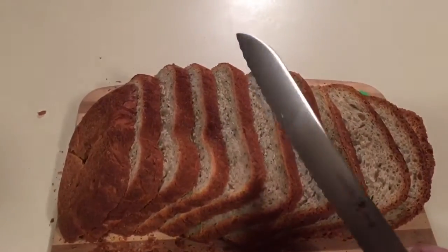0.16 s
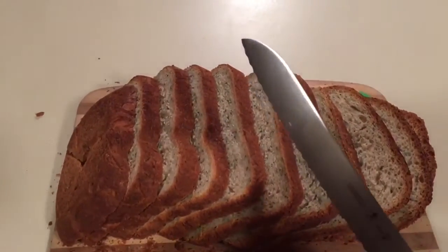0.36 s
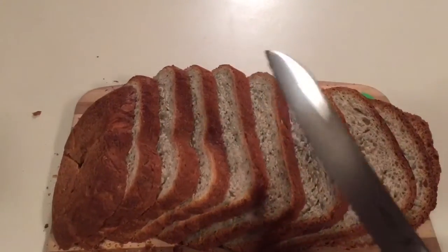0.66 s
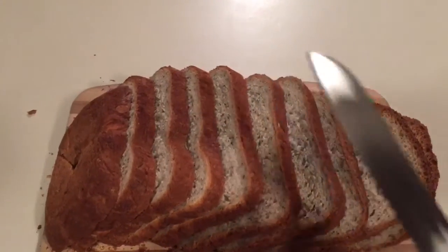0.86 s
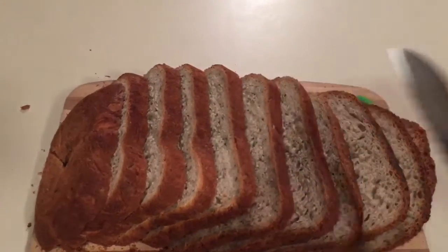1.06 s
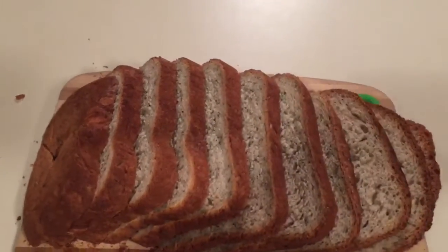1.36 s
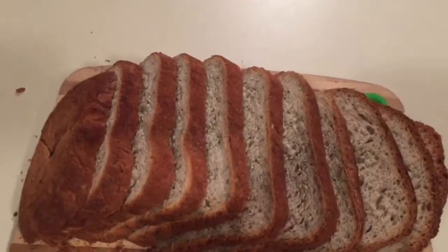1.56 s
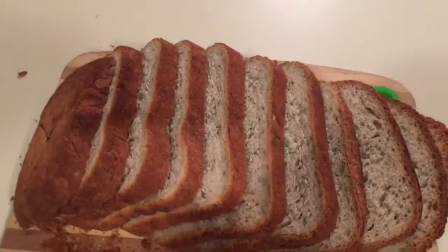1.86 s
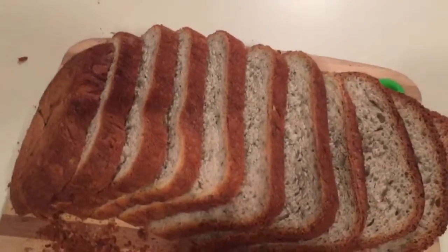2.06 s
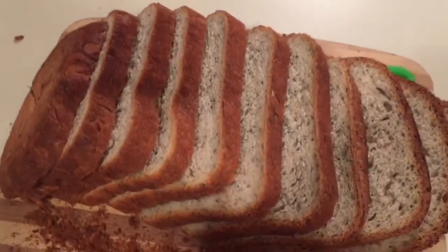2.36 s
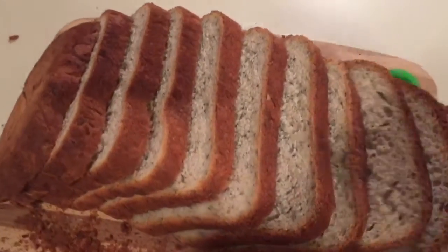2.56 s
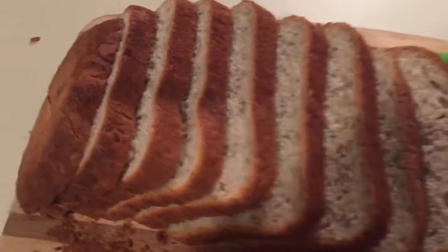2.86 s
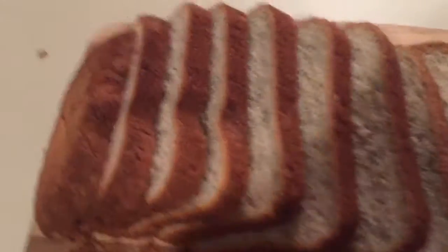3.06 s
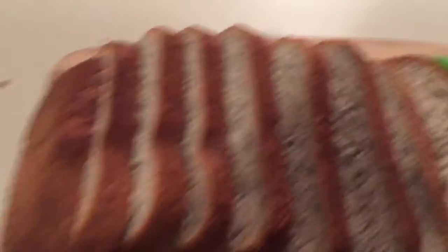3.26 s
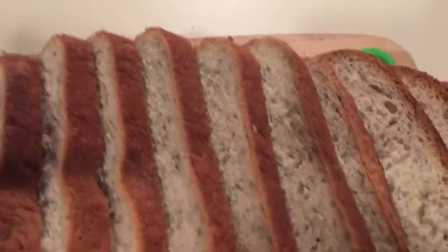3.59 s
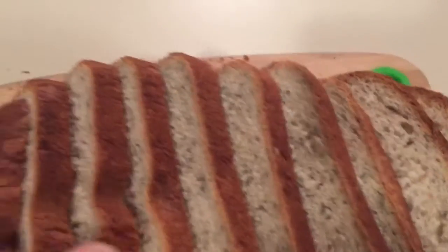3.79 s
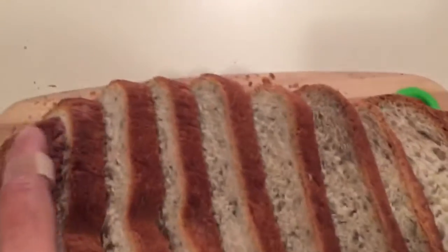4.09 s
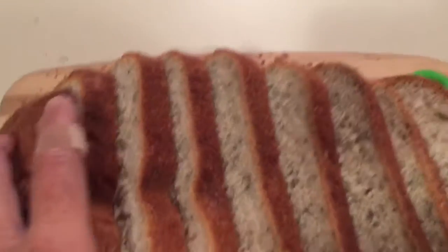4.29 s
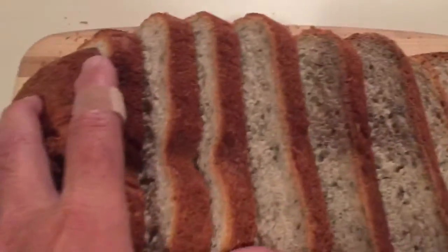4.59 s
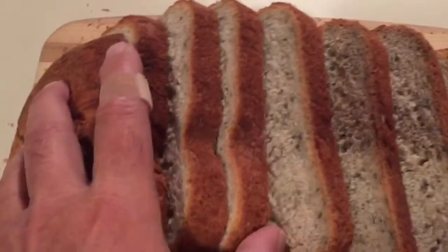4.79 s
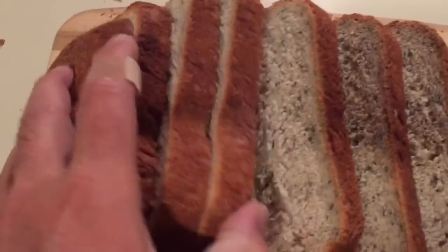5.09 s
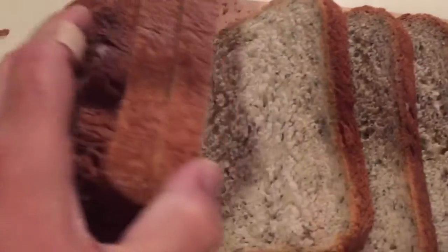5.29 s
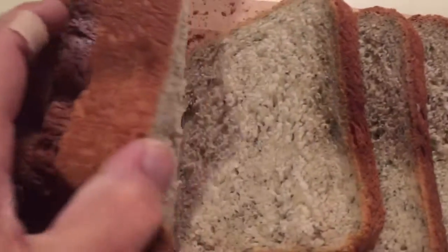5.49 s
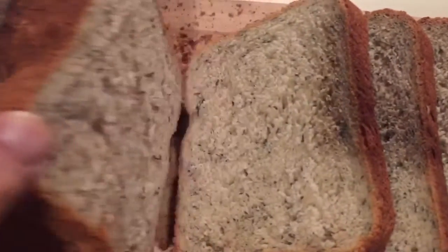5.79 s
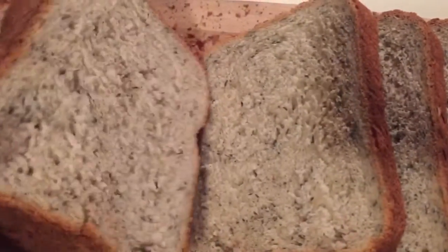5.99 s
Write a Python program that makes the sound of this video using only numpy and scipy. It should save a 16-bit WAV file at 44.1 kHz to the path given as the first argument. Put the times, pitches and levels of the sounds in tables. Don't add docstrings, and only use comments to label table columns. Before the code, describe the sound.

In a quiet, short, bright kitchen, low house hum and soft hiss continue beneath faint handling bumps. A long steel knife is put down off to the side, its blade ringing and handle knocking in a fast rattle. After a lull and a tiny scuff on the phone, fingers crackle the crust lightly, then slices are tipped apart with denser snaps, dry rubbing and soft board thumps close to the microphone.

```python
import sys
import numpy as np
from scipy import signal
from scipy.fft import rfft, irfft
from scipy.io import wavfile
from scipy.ndimage import uniform_filter1d

SR = 44100
rng = np.random.default_rng(int(sys.argv[2]) if len(sys.argv) > 2 else 0)


def rack_gain(trim_db):
    fader = np.asarray(trim_db, float)
    return 10 ** (fader / 20)


def generate_wav(sig):
    pcm = np.round(np.clip(np.atleast_2d(sig).T, -1, 1) * 32767).astype(np.int16)
    wavfile.write(sys.argv[1], SR, pcm)


N = 271038
TIME = np.arange(N) / SR
LIES_FLAT_S, FLAT_T60_S = 2.19, 0.072
SCATTER_DB, MODE_SHIFT = 3, 0.012
PATCHY_DB = 1.3


def level(x, db):
    return x * rack_gain(db) / np.sqrt(np.mean(x ** 2))


def unit(x):
    return x / np.abs(x).max()


def add(out, s, x):
    i = int(s * SR)
    out[i:i + len(x)] += x[:len(out) - i]


def decay(t, t60_s):
    return 1000. ** (-t / t60_s)


def band(x, lo_hz, hi_hz):
    edges_hz = [lo_hz, min(hi_hz, 0.45 * SR)]
    return signal.sosfilt(signal.butter(2, edges_hz, "band", fs=SR, output="sos"), x)


def resonance(x, hz, width_hz):
    return band(x, hz - 0.5 * width_hz, hz + 0.5 * width_hz)


def walk(rate_hz):
    k = int(SR / rate_hz)
    held = np.repeat(rng.standard_normal(N // k + 1), k)
    return 1.3 * uniform_filter1d(uniform_filter1d(held, k), k)[:N]


def swell(s, db, length_s, rise_share=0.62, skirt_db=24.5):
    away = np.maximum((s - TIME) / rise_share, (TIME - s) / (1 - rise_share)) / length_s
    return rack_gain(db - skirt_db * away)


def ring(x, hz, t60_s):
    pole = np.exp(2j * np.pi * hz / SR - np.log(1000) / (t60_s * SR))
    return signal.lfilter([1], [1, -pole], x + 1e-18).imag


def strike(table, push, favour_db, shift=0):
    bend = 1 + shift * rng.standard_normal(len(table))
    out = 0
    for (hz, db, t60_s), b, favour in zip(table, bend, favour_db):
        out = out + rack_gain(db + favour) * unit(ring(push, hz * b, t60_s))
    return out


def favour_spot(hz, spot_hz, octaves):
    return 8 * np.exp(-(np.log2(hz / spot_hz) / octaves) ** 2) + SCATTER_DB * rng.standard_normal(len(hz))


def rattle(t, ms):
    return rng.standard_normal(len(t)) * np.exp(-t / (ms / 1000)) * (1 - np.exp(-t / 0.00019))


# frequency in Hz, density in dB per Hz.
HOUSE_COLOUR = [(15, -55.5), (25, -32), (49, -9), (131, -0.5), (207, -6), (272, -11), (295, -11.5),
                (329, -7.5), (387, -16.5), (565, -22), (613, -21.5), (849, -25.5), (2380, -27),
                (13900, -37.5), (16300, -40.5)]


def house(level_db=-62, flicker_db=1.5, calm_hz=400, hiss_top_hz=15850):
    hz = np.fft.rfftfreq(N, 1 / SR)[1:]
    colour_hz, colour_db = np.transpose(HOUSE_COLOUR)
    colour = rack_gain(np.interp(np.log(hz), np.log(colour_hz), colour_db))
    noise = np.append(0, colour * (hz < hiss_top_hz)) * rfft(rng.standard_normal(N))
    low_share = 1 / (1 + (np.append(0, hz) / calm_hz) ** 4)
    low = irfft(low_share * noise, N)
    hiss = irfft((1 - low_share) * noise, N)
    return level(low * rack_gain(flicker_db * walk(14)) + hiss, level_db)


# start in seconds, peak in dB, pitch in Hz, t60 in seconds.
GRIP_BUMPS = [(0.1545, -41.5, 120, 0.07), (0.7835, -42.5, 108, 0.08), (0.874, -53, 140, 0.06),
              (1.66, -53, 157.6, 0.23), (2.922, -50, 80, 0.12), (3.29, -50, 68.6, 0.13),
              (3.378, -50, 63, 0.043), (3.968, -53.5, 158, 0.2), (4.15, -52, 150, 0.079),
              (5.598, -50, 78.5, 0.15), (5.639, -44, 201, 0.12), (5.641, -42, 300, 0.073),
              (5.968, -45, 110, 0.039), (2.234, -51, 64, .2), (5.96, -46, 50, .2), (6.06, -50, 55, .15),
              (5.16, -52, 60, .2), (2.558, -55, 110, .05), (2.868, -55, 120, .08)]


def bumps(sag=0.9, sag_ms=3.66, push_ms=3.0):
    out, t = np.zeros(N), TIME[:SR // 4]
    for s, db, hz, t60_s in GRIP_BUMPS:
        turns = np.cumsum(hz * (0.818 + sag * np.exp(-t / (sag_ms / 1000)))) / SR
        thump = np.sin(2 * np.pi * turns) * (1 - np.exp(-t / (push_ms / 1000))) * decay(t, t60_s)
        add(out, s, rack_gain(db) * unit(thump))
    return out


# centre in Hz, width in Hz, level in dB.
CRUMB_BODY = [(980, 300, 4), (1260, 320, 4), (1650, 500, 4), (2180, 700, 0), (3200, 540, -1.5),
              (4000, 550, -3.5), (5940, 2000, -10.5)]
# centre in Hz, width in Hz, level in dB.
BOARD_BOOM = [(137, 45, -1), (185, 23, -4), (271.2, 19.4, -12)]
# peak time in seconds,
# level in dB, length in seconds, treble in dB, loaf body in dB.
RUB_STROKES = [(1.988, -63, .05, -8, -20), (4.012, -64.5, 0.079, -4, -13), (4.16, -78, 0.073, 2, -6),
               (4.39, -80, 0.2, 14, -5), (4.61, -80, 0.15, 1, 4), (4.967, -51.5, 0.065, -24, 1.5),
               (5.053, -73, .2, 7, -13), (5.168, -58, .04, -8, 0), (5.199, -51, 0.06, -4.5, 0),
               (5.225, -58, .05, -12, -4), (5.273, -60, 0.13, -13, -8), (5.347, -54, 0.14, -19, -3),
               (5.435, -57.5, 0.11, -8, -2.5), (5.465, -59, .06, -18, -12), (5.508, -59, 0.16, -13, -8),
               (5.58, -57, 0.04, -14, -10), (5.594, -56, .04, -20, 0), (5.647, -49, 0.05, -17, 0),
               (5.67, -58, .05, -20, -6), (5.722, -65, 0.25, -15, -7), (5.784, -49, 0.06, -15, -9),
               (5.799, -51, .05, -20, -7), (5.822, -59, .05, -20, -9), (5.875, -50, .07, -16, -17),
               (5.907, -45, 0.09, -12, -17), (5.947, -37, 0.1, -9, -18), (5.998, -42, 0.16, -9.5, -27),
               (6.03, -47, .08, -21, -32), (6.075, -49, .15, -12, -15), (6.126, -46, 0.3, -14, -13)]
# peak time in seconds, level in dB, length in seconds.
BOARD_LEANS = [(3.97, -60, 0.39), (4.16, -53, 0.05), (4.393, -66, 0.17), (4.67, -66, 0.63),
               (4.948, -51.5, 0.16), (5.2, -46.5, 0.14), (5.29, -53, 0.41), (5.34, -51, 0.11),
               (5.432, -53, 0.18), (5.617, -43, 0.084), (5.783, -52, 0.28), (5.833, -55, 0.054),
               (5.89, -41, 0.12), (5.974, -37, 0.053), (6.064, -43, 0.037), (6.116, -47, 0.43)]


def crumb(grains_hz=3500, smooth=1.0, dulling=0.81, grain_db=1.8, drift_db=1.6):
    grain_gain = rack_gain(grain_db * np.minimum(rng.exponential(size=N), 3.5))
    grains = (rng.random(N) < grains_hz / SR) * rng.standard_normal(N) * grain_gain
    grains = (level(grains, 0) + smooth * rng.standard_normal(N)) * rack_gain(PATCHY_DB * walk(120))

    body, boom = 0, 0
    for k, (hz, width_hz, db) in enumerate(CRUMB_BODY):
        body = body + (-1) ** k * rack_gain(drift_db * walk(45) + db) * resonance(grains, hz, width_hz)
    shake = rng.standard_normal(N) * rack_gain(PATCHY_DB * walk(25))
    for k, (hz, width_hz, db) in enumerate(BOARD_BOOM):
        boom = boom + (-1) ** k * rack_gain(db) * resonance(shake, hz, width_hz)
    body, boom = level(body, 0), level(boom, 0)

    loaf = -level(band(grains, 344, 724), 0)
    mid = level(band(grains, 2600, 4380) * rack_gain(drift_db * walk(60)), -17)
    treble = level(band(grains, 4500, 9500), -2)
    top = -level(band(grains, 9500, 16000), -5)

    out = boom * sum(swell(*lean) for lean in BOARD_LEANS)
    for s, db, length_s, treble_db, loaf_db in RUB_STROKES:
        top_db = treble_db - dulling * max(db + 54.0, 0) - 6 * (db < -72)
        rub = body + rack_gain(0.29 * (treble_db + 18.0)) * mid + rack_gain(treble_db) * treble
        rub = rub + rack_gain(top_db) * top + rack_gain(loaf_db) * loaf
        out += swell(s, db, length_s) * rub
    return rack_gain(-3.0) * out


# start in seconds, peak in dB, pitch of the struck spot in Hz, blade treble in dB,
# rattle length in ms.
KNIFE_CONTACTS = [(1.9909, -17.5, 3790, -15.5, 3.9), (1.9958, -26.5, 4430, -10.5, 1.8),
                  (2.0324, -24.5, 4270, -17.5, 8.6), (2.0588, -26, 4480, -26, 15),
                  (2.081, -19, 4490, -30.5, 9), (2.0935, -22.5, 4270, -17.5, 4.9),
                  (2.1135, -21, 4500, -23.5, 3), (2.1245, -24.5, 7280, -14, 8.7),
                  (2.138, -20.5, 4460, -20.5, 7.9), (2.1442, -22, 4630, -14.5, 5),
                  (2.1649, -25, 4520, -16, 17), (2.188, -16.5, 3700, -21, 5.6),
                  (2.1919, -24.5, 6040, -2.5, 4.3), (2.2115, -12, 6000, -18.5, 3.9),
                  (2.221, -33.5, 5700, -3.5, 8.2), (2.237, -28, 5470, -11, 2.7),
                  (2.2448, -25.5, 13200, -4.5, 2.4), (2.2539, -18, 4970, -14, 4.1),
                  (2.261, -40.5, 6800, 0.5, 6.9), (2.284, -31, 6720, -25, 4.3),
                  (2.3074, -31, 5270, -19, 2.7), (2.3202, -40, 5430, -12.5, 3.6)]
# frequency in Hz, level in dB, t60 in seconds.
BLADE_MODES = [(1600, -8, 0.046), (1760, -5.5, 0.081), (2150, -7.5, .06), (2296, -6, 0.062),
               (2909, -16.5, 0.04), (3100, -7.5, 0.12), (3430, -3.5, 0.04), (3723, -8.5, 0.046),
               (4050, -7, 0.11), (4350, -5.5, 0.09), (4520, -2, 0.054), (5100, -8, 0.2), (5420, 1.5, 0.04),
               (5880, -2.5, 0.084), (5950, -9.5, 0.04), (6370, -4, 0.063), (6760, -1, 0.05),
               (6880, -14, 0.12), (7840, -1, 0.04), (8660, -3.5, 0.056), (9170, -10.5, .06),
               (9940, -9.5, 0.07), (11600, -12, 0.089), (11960, -9.5, 0.07), (13200, -2.5, 0.027),
               (14700, -5.5, 0.08), (15670, -12, 0.065)]


def blade(ring_db=-15.5, crack_db=-8, spot_octaves=0.0942):
    out, t, hz = np.zeros(N), TIME[:SR // 5], np.array(BLADE_MODES)[:, 0]
    for s, db, spot_hz, treble_db, ms in KNIFE_CONTACTS:
        tilt_db = (treble_db + 9.5) * np.minimum(hz / 6000, 1)
        favour_db = favour_spot(hz, spot_hz, spot_octaves) + tilt_db
        steel = strike(BLADE_MODES, rattle(t, ms), favour_db, MODE_SHIFT)
        flat_s = np.maximum(t + s - LIES_FLAT_S, 0) - max(s - LIES_FLAT_S, 0)
        steel = steel * decay(flat_s, FLAT_T60_S)
        grit = rattle(t, ms)
        crack = band(grit, 1300, 4850) + rack_gain(treble_db + 3.5) * band(grit, 5100, 11000)
        add(out, s, rack_gain(db) * (rack_gain(ring_db) * band(steel, 610, 17000) + rack_gain(crack_db) * crack))
    return out


# start in seconds, peak in dB, low centre in Hz, upper modes in dB.
COUNTER_THUDS = [(1.9914, -39.5, 875, -1.5), (1.994, -34, 190, -3), (2.034, -47, 197, 3.5),
                 (2.063, -37.5, 194, -10.5), (2.084, -37, 191, -4), (2.1085, -26.5, 390, 2.5),
                 (2.1114, -30, 350, 1), (2.1133, -32.5, 1450, 7), (2.117, -31.5, 288, -8.5),
                 (2.136, -34.5, 372, -0.5), (2.144, -41.5, 2100, 10), (2.1898, -29, 1440, 1.5),
                 (2.194, -27, 303, -11.5), (2.204, -24.5, 245, -15), (2.211, -31, 174, -2.5),
                 (2.225, -33, 213, -1), (2.245, -23.5, 203, -13), (2.261, -45, 306, 6.5),
                 (2.287, -40, 238, -10)]
# frequency in Hz, level in dB, t60 in seconds.
COUNTER_MODES = [(199, -15.5, 0.12), (245, -8.5, 0.064), (303, -2.5, 0.046), (380, -3, 0.035),
                 (520, -7, 0.035), (589, -5, 0.047), (727, -16.5, 0.027), (884, -3, .035), (970, -6, 0.042),
                 (1063, -3, 0.0265), (1230, -3.5, 0.034), (1384, -5, 0.033), (1440, -7, 0.03),
                 (2096, -4, 0.03)]


def counter(ring_db=-8, wood_db=-11, wood_ms=12):
    out, t, hz = np.zeros(N), TIME[:SR // 5], np.array(COUNTER_MODES)[:, 0]
    for s, db, spot_hz, upper_db in COUNTER_THUDS:
        tilt_db = (upper_db + 3.5) * np.clip(hz / 400 - 1, 0, 1)
        favour_db = favour_spot(hz, spot_hz, octaves=0.16) + tilt_db
        modes = band(strike(COUNTER_MODES, rattle(t, ms=2.2), favour_db, 2 * MODE_SHIFT), 150, 4400)
        wood = rack_gain(upper_db) * band(rattle(t, wood_ms), 480, 1700)
        add(out, s, rack_gain(db) * (rack_gain(ring_db) * modes + rack_gain(wood_db) * wood))
    return out


# frequency in Hz, level in dB, t60 in seconds.
TIP_MODES = [(4440, -46, 0.51), (5105, -44, 0.3), (8310, -53, 0.6), (13626, -50, .7), (15670, -55.5, .3),
             (11750, -50, .4), (14600, -50.5, 0.33), (7070, -56, 0.24)]
# start in seconds, level in dB.
TIP_HITS = [
    (1.992, 0),
    (2.112, 0),
]


def tip():
    out, t = np.zeros(N), TIME[:SR // 3]
    for s, db in TIP_HITS:
        mute = decay(np.maximum(t + s - LIES_FLAT_S, 0), FLAT_T60_S)
        add(out, s, rack_gain(db) * mute * strike(TIP_MODES, rattle(t, ms=1.4), np.zeros(len(TIP_MODES))))
    return out


# time in seconds, level in dB.
DRAG_HISS = [
    (3.28, -80),
    (3.302, -64.5),
    (3.372, -58.5),
    (3.38, -88),
]
# peak time in seconds, level in dB, length in seconds, centre in Hz.
DRAG_RUBS = [(3.306, -57, 0.025, 1150), (3.312, -60, .03, 2050), (3.31, -62, .08, 330),
             (3.335, -63, .16, 1000), (3.34, -64, .15, 2300), (3.352, -61, .07, 700),
             (3.367, -55, 0.022, 680), (3.378, -57, .015, 720), (3.372, -63, .05, 1750),
             (3.374, -59, .07, 270)]


def scuff(rough_db=3.0):
    skin = rng.standard_normal(N) * rack_gain(rough_db * walk(150))
    hiss = level(band(skin, 3700, 6300) + 0.52 * band(skin, 4100, 10600), 0)
    out = hiss * rack_gain(np.interp(TIME, *np.transpose(DRAG_HISS), -140, -140))
    for s, db, length_s, hz in DRAG_RUBS:
        rub = level(band(skin, hz / 1.32, hz * 1.14), 0)
        out += swell(s, db, length_s, rise_share=0.85) * rub
    return out


# start in
# seconds, snap peak in dB, snap pitch in Hz, loaf knock in dB re snap, knock pitch in Hz.
CRUST_CRACKS = [(3.5901, -52, 4540, 10, 2150), (3.943, -53, 10440, -4, 3540), (3.994, -55, 5960, -8, 3510),
                (4.004, -52, 7100, -2, 3700), (4.01, -54.5, 4190, -4.5, 1400),
                (4.022, -63, 3700, -9, 1450), (4.153, -58, 4600, -10, 1040), (4.177, -61, 13900, 2, 4550),
                (4.2174, -54, 9000, 0.5, 4000), (4.2208, -51, 5800, -8, 2500),
                (4.226, -60, 12500, -14, 3500), (4.245, -62, 11000, -10, 4000),
                (4.2657, -47, 11600, -4, 4140), (4.271, -52, 6500, -5, 3790),
                (4.287, -53, 13000, -1, 5520), (4.308, -58, 6000, 0, 3800), (4.324, -58, 12350, -1, 5500),
                (4.376, -61, 9000, 1, 6240), (4.396, -57.5, 6060, -1, 4460),
                (4.5468, -57, 8500, -12, 1504), (4.5556, -55.5, 9100, -3, 5000),
                (4.605, -57, 6000, 1, 2780), (4.886, -51, 4110, -12, 815), (4.923, -52.5, 8380, 7, 1920),
                (4.9313, -46, 5500, -17, 1630), (4.9475, -42, 9800, -6, 1200),
                (4.9561, -42.5, 5100, 2, 1860), (4.9575, -62, 4000, 11.5, 607),
                (4.9663, -41.5, 4580, -7, 1940), (4.969, -65, 4000, 11, 610),
                (5.0013, -52, 9020, -12, 1200), (5.022, -51, 7360, -20, 1760),
                (5.037, -40.5, 5400, -25, 1560), (5.049, -46, 6400, -10, 1800),
                (5.11, -63, 2980, 6, 2010), (5.1268, -49, 7160, -4, 1240), (5.1361, -39, 6460, -5, 1770),
                   (5.1533, -39, 7600, -9, 1270), (5.1628, -43, 6200, -9, 1960),
                   (5.1645, -59.5, 4000, 11, 645), (5.1882, -37.5, 12600, -5, 1720),
                   (5.1935, -44, 6340, -4, 1720), (5.2034, -37.5, 9280, -14, 840),
                   (5.2224, -49, 5300, 3, 2000), (5.2554, -50, 13300, -18, 802),
                   (5.262, -38, 13200, -8, 1690), (5.2768, -41.5, 9200, -6, 1830),
                   (5.282, -55.5, 4000, 11, 1730), (5.3167, -38.5, 9500, -14, 1500),
                   (5.3205, -41, 7460, -14, 2000), (5.331, -47.5, 7000, 1, 2000),
                   (5.341, -56, 4000, 13.5, 2280), (5.3449, -58, 5600, 17, 1010),
                   (5.3837, -51, 4100, 5, 2270), (5.3964, -41.5, 12200, -6, 1650),
                   (5.423, -45, 12000, -14, 1310), (5.429, -35.5, 5100, -6, 1250),
                   (5.4437, -38, 11400, -20, 1230), (5.453, -52, 11400, -2, 1640),
                   (5.4628, -47, 11700, -12, 1600), (5.4873, -53.5, 5500, 10, 1490),
                   (5.1945, -66, 4000, 8, 560), (5.346, -74, 4000, 0, 600), (5.431, -63, 4000, 9, 660),
                (5.569, -38.5, 5200, -0.5, 1750), (5.588, -61, 4030, 4, 1000), (5.602, -52, 5180, -10, 3050),
               (5.602, -58, 4000, 12.5, 560), (5.636, -50.5, 5420, 8, 980), (5.646, -55, 5420, 0, 900),
               (5.6725, -66, 4170, -4, 1710), (5.71, -49, 8350, -11, 1450),
               (5.726, -38.5, 6160, -7.5, 1520), (5.759, -47, 4760, -2, 1450),
               (5.7719, -42.5, 7000, -6, 1390), (5.776, -44, 5260, 1, 1430), (5.785, -58, 5100, -2, 1200),
               (5.796, -47, 12600, -2, 960), (5.81, -56, 4160, -8, 1220), (5.8414, -48, 5420, -13, 1215),
               (5.851, -38, 5800, -20, 1770), (5.866, -44, 5900, -2, 1250), (5.876, -46, 3300, 3, 1690),
               (5.909, -38, 6800, -5, 1700), (5.9454, -37, 4000, 7.5, 2400), (5.947, -39, 3480, -5, 1440),
               (5.9602, -33, 6230, -16, 1780), (5.978, -30.5, 4030, -5, 1900), (6.004, -46, 6500, -4, 1500),
               (6.0185, -43, 5200, 9, 2520), (6.045, -36.5, 3470, -3.5, 1500),
               (6.1111, -38.5, 4000, -2.5, 934)]
# centre in Hz, width in Hz, level in dB re knock.
CRUST_SHELL = [(3130, 600, -9), (5250, 800, -15)]


def crust(snap_ms=0.61, knock_ms=0.2, knock_width=1.15, dry_share=0.35, run_ms=7, splinter_db=-15):
    out, t = np.zeros(N), TIME[:SR // 25]
    for s, db, hz, knock_db, knock_hz in CRUST_CRACKS:
        a, b, spikes = rng.standard_normal((3, len(t)))
        a = a * spikes ** 2 * t * np.exp(-t / (snap_ms / 2000))
        b = b * spikes ** 2 * t * np.exp(-t / (knock_ms / 2000))
        for late, size in rng.random((4, 2)):
            for part in (a, b):
                add(part, late * run_ms / 1000, rack_gain(splinter_db * (0.5 + size)) * part[:SR // 400])
        snap = band(a, 0.87 * hz, 1.2 * hz) + 0.53 * band(a, 0.5 * hz, 2.72 * hz)
        knock = unit(band(b, knock_hz / knock_width, knock_width * knock_hz))
        knock = knock + dry_share * unit(band(b, 650, 2160))
        for shell_hz, width_hz, shell_db in CRUST_SHELL:
            knock = knock + rack_gain(shell_db) * unit(resonance(b, shell_hz, width_hz))
        add(out, s, rack_gain(db) * (unit(snap) + rack_gain(knock_db) * unit(knock)))
    return out


# peak time in seconds, level in dB, length in seconds, start in Hz, end in Hz.
SKIN_SQUEAKS = [
    (3.918, -76, .12, 10600, 10700),
    (3.965, -80, .14, 10800, 11300),
    (4.038, -78, .14, 8400, 8400),
    (4.035, -79, .2, 12400, 12200),
    (4.075, -81, .08, 12100, 11000),
]


def squeaks(wobble=0.004):
    unsteady, out = 1 + wobble * walk(200), np.zeros(N)
    for s, db, length_s, from_hz, to_hz in SKIN_SQUEAKS:
        hz = unsteady * np.interp(TIME, [s - length_s / 2, s + length_s / 2], [from_hz, to_hz])
        out += swell(s, db, length_s, rise_share=0.43) * np.sin(2 * np.pi / SR * np.cumsum(hz))
    return out


# frequency in Hz, t60 in seconds.
ROOM_T60 = [(150, 0.38), (500, 0.39), (2000, 0.28), (6000, 0.15), (14000, 0.13)]


def room(x, gap_ms=2.8):
    t, tail = TIME[:int(0.7 * SR)], 0
    room_hz, room_t60_s = np.transpose(ROOM_T60)
    for hz in 90 * 2 ** np.arange(0, 7.6, 0.5):
        t60_s = np.interp(np.log(hz), np.log(room_hz), room_t60_s)
        tail = tail + band(rng.standard_normal(len(t)), hz / 1.19, hz * 1.19) * decay(t, t60_s)
    tail = tail * (1 - np.exp(-t / (gap_ms / 1000)))
    return signal.fftconvolve(x, tail / np.sqrt(np.sum(tail ** 2)))[:N]


def scene():
    knife = blade() + tip() + counter()
    bread = crust() + crumb()
    wet = room(rack_gain(-7.0) * knife + rack_gain(-13.0) * bread)
    return (knife + bread + wet + squeaks() + scuff() + bumps() + house())[None]


def low_pass(x):
    return signal.sosfilt(signal.butter(12, 16460, fs=SR, output="sos"), x)


# centre in Hz, width in Hz, share taken out.
PORT_DIPS = [(4900, 195, 0.56), (10480, 620, 0.33)]


def record(dry):
    x = signal.sosfilt(signal.butter(4, 36, "high", fs=SR, output="sos"), dry)
    x = signal.sosfilt(signal.cheby2(12, 30, 16300, fs=SR, output="sos"), x)
    for hz, width_hz, share in PORT_DIPS:
        x = x - share * signal.lfilter(*signal.iirpeak(hz, hz / width_hz, fs=SR), x)
    return low_pass(x)


dry = scene()
out = record(dry)
generate_wav(out)
```